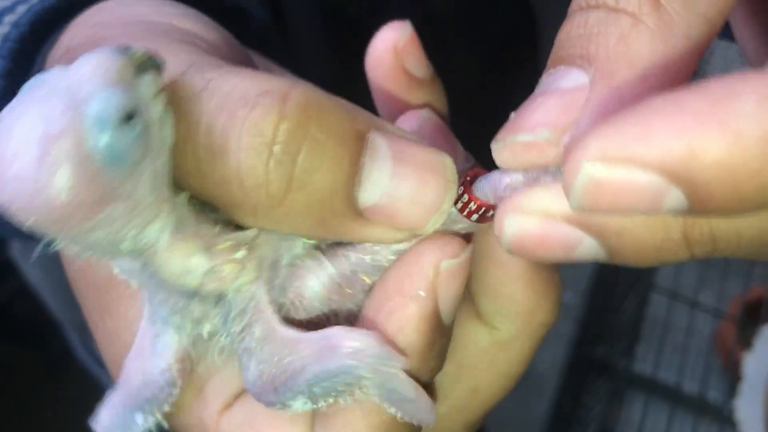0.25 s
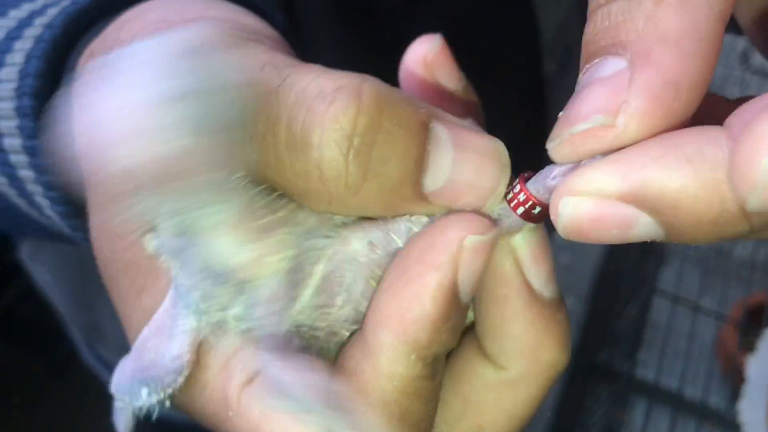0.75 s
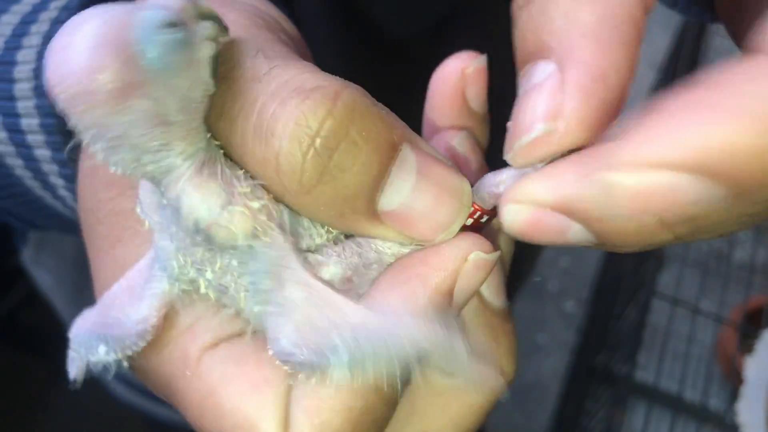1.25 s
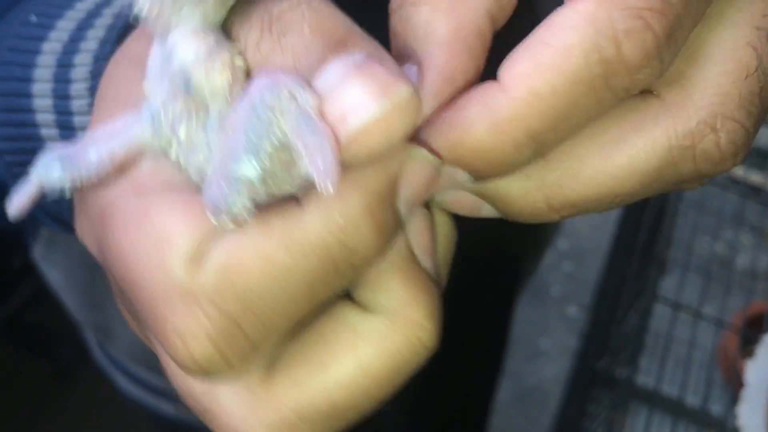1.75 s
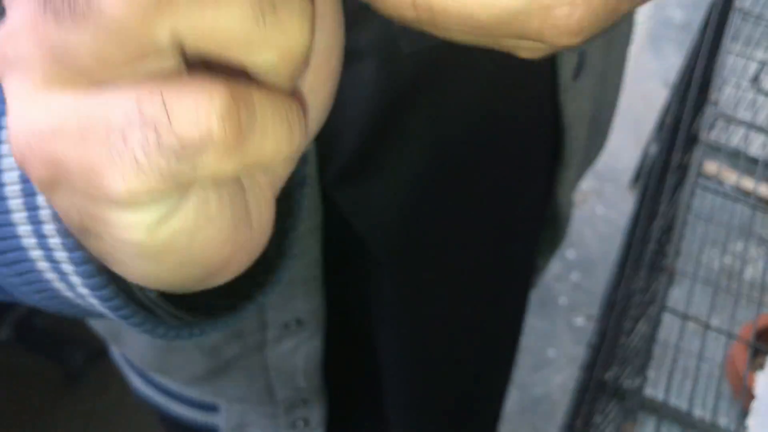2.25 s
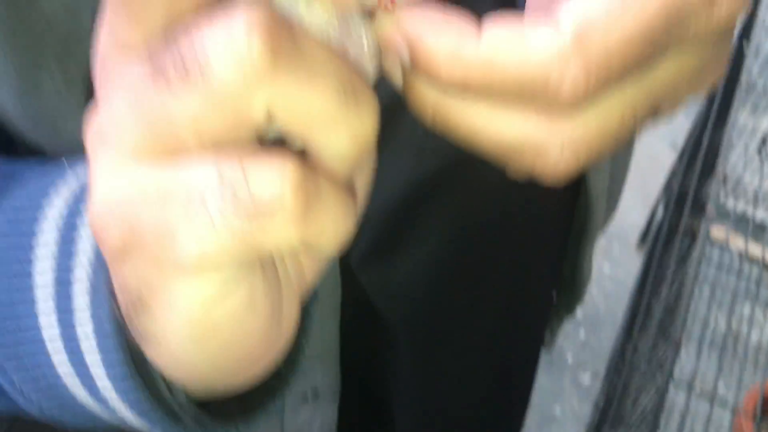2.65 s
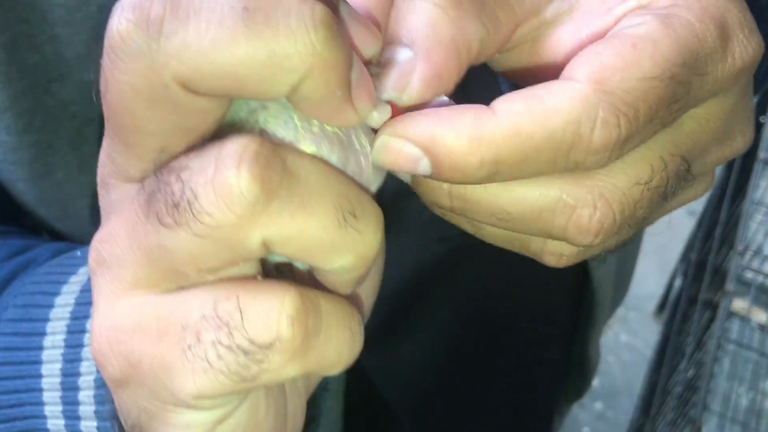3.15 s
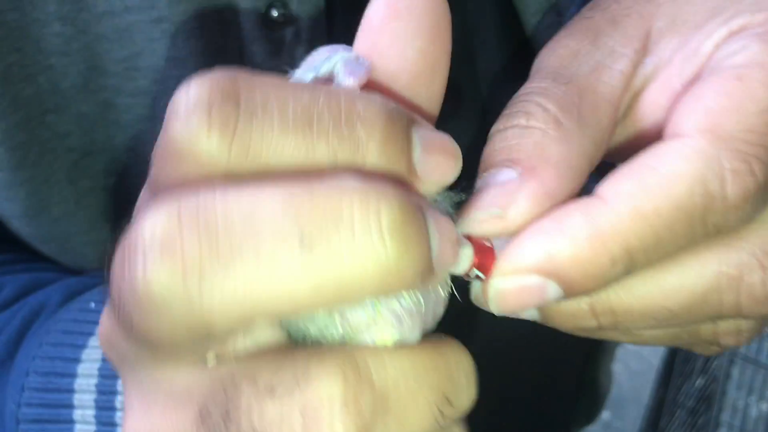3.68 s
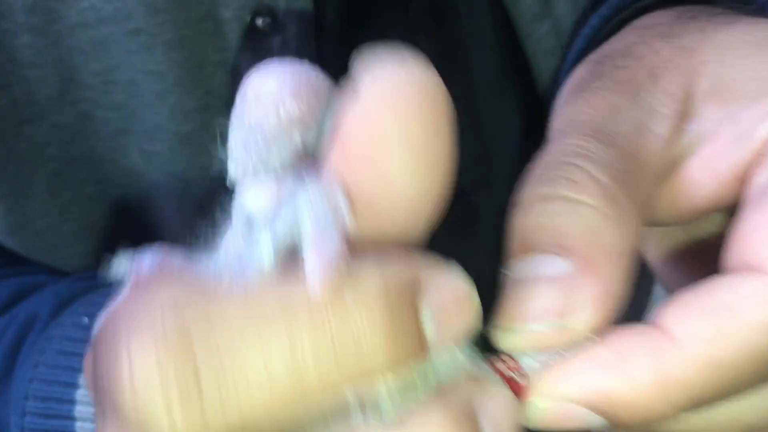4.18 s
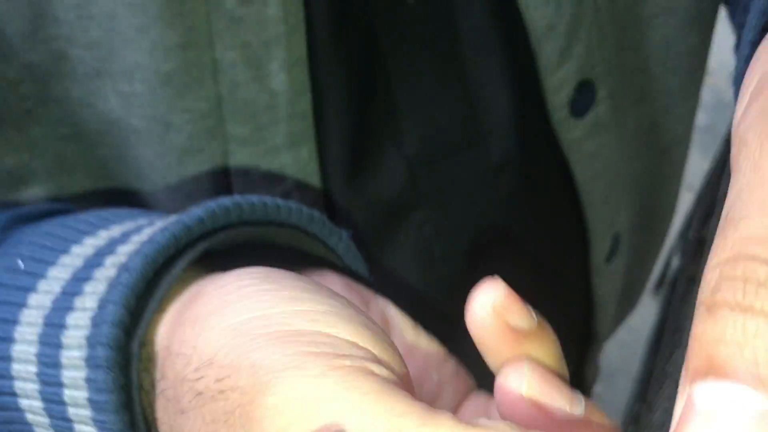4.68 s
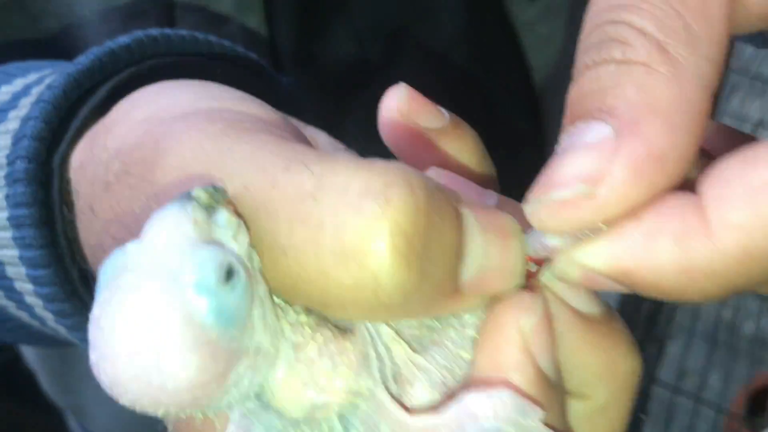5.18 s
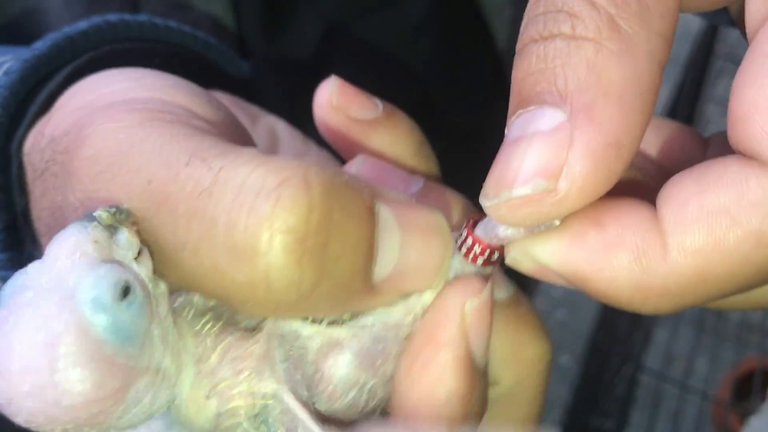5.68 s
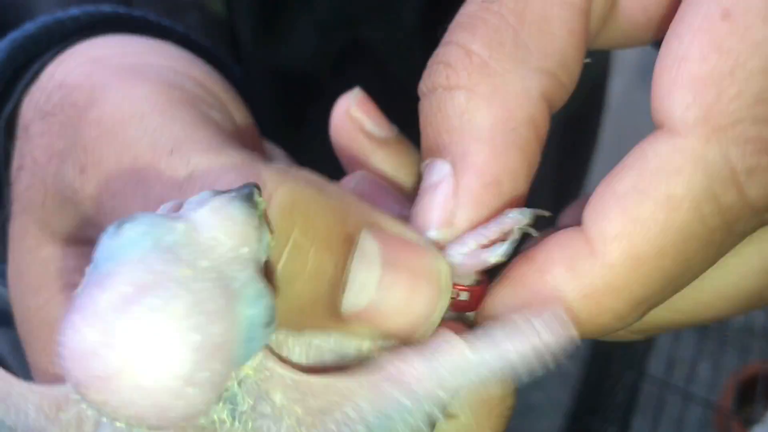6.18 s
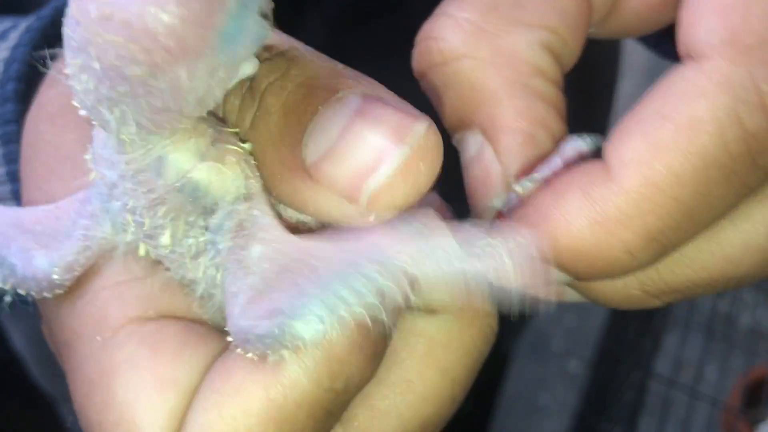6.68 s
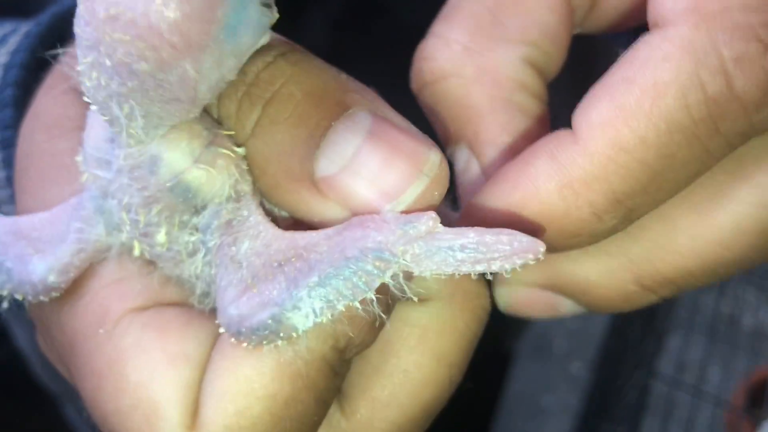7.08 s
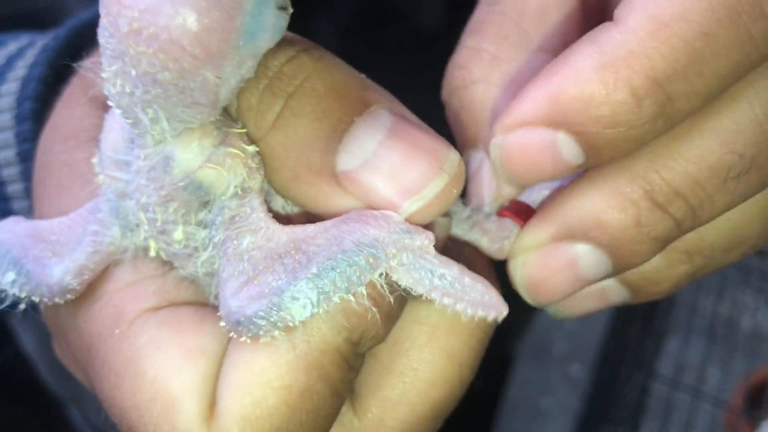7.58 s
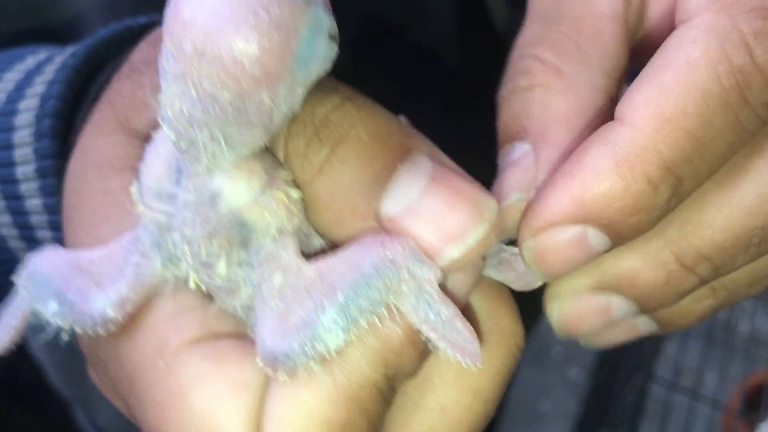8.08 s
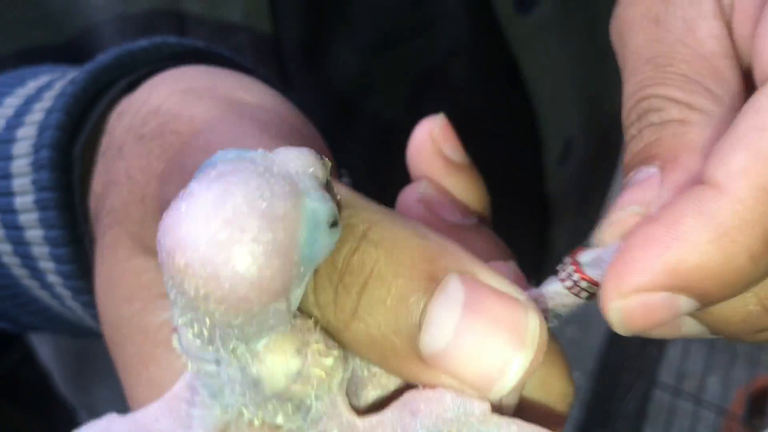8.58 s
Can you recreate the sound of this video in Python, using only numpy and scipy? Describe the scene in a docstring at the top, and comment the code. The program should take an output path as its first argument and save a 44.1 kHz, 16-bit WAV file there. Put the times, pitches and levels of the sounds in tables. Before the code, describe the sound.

A frightened parrot chick gives quick whistles breaking into rasps in an echoing room, with softer chirps and a few small clicks.

```python
"""A hard, echoing bird room: a parrot chick, held in the hands, cries in fright about four times a second.
Each cry is a thin whistle that breaks into a lower, falling rasp. Softer calls come between, from it
and from other chicks; every voice is syrinx harmonics and hiss shaped by throat and beak.
Something scrapes once close by, fingers tick on a leg ring, and the room hums faintly."""
import sys
import numpy as np
from scipy import signal
from scipy.fft import rfft, irfft, next_fast_len
from scipy.io import wavfile
from scipy.ndimage import map_coordinates

SR = 44100
rng = np.random.default_rng(int(sys.argv[2]) if len(sys.argv) > 2 else 0)


def transcribe(u):
    """Save the signal u as a 16-bit wav file named by the first command-line argument.

    u: samples, shape (n,) or (channels, n), limited to [-1, 1]; the rate is SR.
    q: integer samples, one column per channel.
    """
    v = np.clip(np.atleast_2d(u).T, -1, 1)
    q = np.round(v * 32767).astype(np.int16)
    wavfile.write(sys.argv[1], SR, q)


N = 389844
TOP_HZ = 15750


def amp(db):
    return 10 ** (np.asarray(db) / 20)


def unit_rms(x):
    return x / np.sqrt(np.mean(x ** 2) + 1e-20)


def along(points, hz):
    """Interpolate (f/Hz, value) points on a log axis."""
    f, v = np.transpose(points)
    return np.interp(np.log(hz + 1), np.log(f + 1), v)


def wobble(rate_hz, n):
    """Smooth random curve, n samples, knots at rate_hz."""
    knots = rng.standard_normal(4096)
    return map_coordinates(knots, [np.arange(n) * rate_hz / SR], mode="wrap")


def filtered(x, response):
    """Apply the gain response(f/Hz)."""
    m = next_fast_len(len(x) + 2048)
    return irfft(rfft(x, m) * response(np.fft.rfftfreq(m, 1 / SR)), m)[:len(x)]


def coloured(x, spectrum):
    """Shape by (f/Hz, level/dB) points; rms 1."""
    return unit_rms(filtered(x, lambda hz: amp(along(spectrum, hz))))


def add(track, start_s, x):
    part = track[max(round(start_s * SR), 0):][:len(x)]
    part += x[:len(part)]


def progress(length_s):
    """Ramp 0 to 1, at least 4 ms."""
    return np.linspace(0, 1, int(max(length_s, .004) * SR))


def swell(u, rise, fall):
    """Note envelope; rise and fall are shares of its length."""
    return np.sin(np.pi / 2 * np.clip(u / rise, 0, 1)) * np.sin(np.pi / 2 * np.clip((1 - u) / fall, 0, 1))


def peak_db(t, rise_db_per_s, fall_db_per_s):
    """Triangle peaking at 0 dB at t = 0."""
    return np.minimum(rise_db_per_s * t, -fall_db_per_s * t)


def air(hum_hz=61.8):
    """Room noise and a low, unsteady hum."""
    spectrum = [(20, -24), (45, -4), (80, -1), (105, 4), (140, -1), (195, 2.5), (330, -2), (480, -8),
                (1000, -3.5), (1600, -8.5), (2700, -11.5), (5000, -18), (12000, -23.5), (15500, -28.5)]  # f/Hz, level/dB
    levels = [(0, -54, -64), (1.3, -53, -54), (2.5, -53.5, -62.5), (3.6, -56.5, -67), (5.3, -55, -59),
              (6.4, -54, -58.5), (7.4, -52.5, -56.6), (8.2, -52.5, -62), (8.84, -55.5, -53)]  # t/s, relative noise level/dB, relative hum level/dB
    t = np.arange(N) / SR
    knots_s, noise_db, hum_db = np.transpose(levels)
    noise = amp(np.interp(t, knots_s, noise_db) + 4) * coloured(rng.standard_normal(N), spectrum)
    hum = np.sin(2 * np.pi * hum_hz * t + 1.3 * wobble(15, N))
    hum_gain = amp(np.interp(t, knots_s, hum_db) + 2.5 + 3 * wobble(8.8, N))
    return noise + hum_gain * hum


def echo(build_s=0.0019):
    """Hard walls: eight early reflections; dense tail, longest near 1.2 kHz, shortest in the bass."""
    decay = [(300, 0.2), (1200, 1.99), (3300, 1.25), (6000, 0.93), (10000, 0.75), (15000, 0.61)]  # f/Hz, t60/s
    hz, t, bins = signal.stft(rng.standard_normal(SR + SR // 4), SR, nperseg=256)
    envelope = amp(-60 * t / along(decay, hz)[:, None]) * (1 - np.exp(-t / build_s))
    tail = signal.istft(bins * envelope, SR, nperseg=256)[1]
    walls = np.zeros(len(tail))
    walls[rng.integers(SR // 300, SR // 30, size=8)] = rng.choice([-1, 1], size=8)
    return tail / np.linalg.norm(tail) + 0.078 * walls


def room(x):
    """The bird keeps moving, so each stretch of sound meets new echoes."""
    hop = SR // 3
    padded, out = np.pad(x, (hop, 2 * hop)), np.zeros(N + hop)
    fade = np.sin(np.linspace(0, np.pi, 2 * hop))
    for start in range(0, N + hop, hop):
        add(out, start / SR, signal.fftconvolve(padded[start:start + 2 * hop] * fade, echo()))
    return out[hop:]


def ring_ticks(snap_t60_s=0.12, knock_t60_s=0.29):
    """Nail on ring: a bright snap, and a dull knock from the hand."""
    ticks = [(0.722, -53, -70), (0.990, -44, -65), (1.898, -49, -62), (1.926, -36.5, -32),
             (7.049, -42, -67)]  # t/s, snap level/dB, knock level/dB
    snap = [(800, -33), (4000, 12), (7000, 7), (10000, 2), (13000, 13), (15500, -6)]  # f/Hz, level/dB
    knock = [(120, -34), (320, 6), (550, -5), (950, 8), (3000, 7), (6000, -32)]  # f/Hz, level/dB
    out, t = np.zeros(N), np.arange(SR // 8) / SR
    for start_s, snap_db, knock_db in ticks:
        for spectrum, db, t60_s in (snap, snap_db, snap_t60_s), (knock, knock_db, knock_t60_s):
            add(out, start_s, amp(db - 60 * t / t60_s) * coloured(rng.standard_normal(len(t)), spectrum))
    return out


def scrape(start_s=2.243, length_s=.044, slip_hz=760, slip_t60_s=0.0051, sink_octaves_per_s=37):
    """A quick run of tiny slips, each a noise burst, over a sinking resonance."""
    spectrum = [(900, -15), (1500, 6), (2300, 3), (3300, -8.5), (4200, -7.5), (6500, 1.5), (7700, -6),
                (11800, -2.5), (13500, -16), (15500, -8)]  # f/Hz, level/dB
    t = np.arange(0, length_s, 1 / SR)
    n = len(t)
    cycles = np.cumsum(slip_hz * (1 + 0.18 * wobble(500, n))) / SR
    slips = amp(-60 * (cycles % 1) / slip_hz / slip_t60_s)
    crackle = coloured(slips * rng.standard_normal(SR // 2)[:n], spectrum)
    body_hz = 2115 * 2 ** (-sink_octaves_per_s * t) * (1 + 0.19 * wobble(1472, n))
    body = np.sin(2 * np.pi * np.cumsum(body_hz) / SR)
    body = unit_rms(body * amp(2.8 * wobble(915, n)))
    crackle_db = -21.5 + peak_db(t - 0.0082, rise_db_per_s=400, fall_db_per_s=450)
    body_db = -25 + peak_db(t - 0.028, rise_db_per_s=900, fall_db_per_s=1400)
    out = np.zeros(N)
    add(out, start_s, amp(crackle_db) * crackle + amp(body_db) * body)
    return out


def syrinx(pitch_hz, rough, throat_db, tilt_db_per_octave=1.0, fade_db=8.0, second_db=0):
    """Ten harmonics through the throat; roughness shakes pitch and level and lets air hiss through."""
    n = len(pitch_hz)
    pitch_hz = pitch_hz * (1 + (0.0035 + 0.0219 * rough) * wobble(108, n))
    jitter = 1 + (0.0067 + 0.067 * rough) * wobble(1300, n)
    phase = 2 * np.pi * np.cumsum(pitch_hz * jitter) / SR
    throat = lambda hz: amp(throat_db(hz)) * (hz < TOP_HZ)
    tone = np.zeros(n)
    for k in range(1, 11):
        harmonic_db = tilt_db_per_octave * np.log2(k) + second_db * (k == 2)
        head_motion_db = fade_db * np.tanh(wobble(75.7, n))
        tone += throat(k * pitch_hz) * amp(harmonic_db + head_motion_db) * np.sin(k * phase)
    flutter = amp((3.5 + 1.35 * rough) * np.tanh(wobble(449, n)))
    puffs = rng.standard_normal(SR // 2)[:n] * (1 + np.cos(phase))
    hiss = unit_rms(filtered(puffs, throat))
    hiss_gain = np.clip(0.91 * rough, 0, 1)
    return unit_rms(flutter * (np.sqrt(1 - hiss_gain ** 2) * unit_rms(tone) + hiss_gain * hiss))


def soft_throat_db(hz, tilt_db_per_octave):
    """Throat response in soft calls, tilted about 3 kHz."""
    response = [(500, -16), (1000, 0), (1700, 2), (2400, 2.5), (3300, -0.5), (4400, -3.5), (5200, -9.5),
                (6200, -9.5), (7500, -14.5), (9500, -16.5), (11500, -24), (15500, -29)]  # f/Hz, level/dB
    return along(response, hz) + tilt_db_per_octave * np.log2(np.clip(hz, 1000, 8000) / 3000)


def far_chicks(count=50):
    """Other chicks chirp hoarsely at random across the room."""
    out = np.zeros(N)
    for i, (offset, length, pitch, strength) in enumerate(rng.random((count, 4))):
        u = progress(0.0298 + 0.0598 * length)
        pitch_hz = (1100 + 900 * pitch) * (1 - .25 * u)
        note = syrinx(pitch_hz, rough=0.56, throat_db=lambda f: soft_throat_db(f, -12))
        start_s = (i + offset) / count * N / SR
        add(out, start_s, amp(-52 + 2 * strength) * swell(u, rise=0.2, fall=0.65) * note)
    return out


def notes(rows, glide, bend, rough, tilt_db_per_octave, rise, fall):
    """Calls gliding by a share of their pitch, early if bend < 1; the beak resonates and adds treble
    as it opens."""
    beak_db, beak_width, beak_rest_hz = 9, 0.36, 3000  # width: half-width over resonance frequency
    out = np.zeros(N)
    for start_s, length_s, hz, db, beak_hz in rows:
        u = progress(length_s)
        gape_db_per_octave = 4 * np.log2(beak_hz / beak_rest_hz)
        resonance_db = lambda f: beak_db / (1 + ((f / beak_hz - 1) / beak_width) ** 2)
        throat_db = lambda f: soft_throat_db(f, tilt_db_per_octave + gape_db_per_octave) + resonance_db(f)
        note = syrinx(hz * (1 + glide * u ** bend), rough, throat_db)
        add(out, start_s, amp(db) * swell(u, rise, fall) * note)
    return out


def small_calls():
    """Thin peeps, hoarse sagging squawks, falling chirps, bright rising squeals, stuttered clucks."""
    # t/s, length/s, starting pitch/Hz, relative level/dB, beak resonance/Hz
    peeps = [ (.363, 0.036, 1727, -43.5, 3400), (.583, 0.11, 1518, -44, 4350), (.925, .1, 1600, -45, 3540),
             (1.323, 0.11, 1482, -50.5, 4350), (1.791, 0.096, 1970, -44.5, 1950),
             (1.943, 0.047, 1320, -37, 6300), (2.318, 0.041, 2750, -36, 2780),
             (3.227, 0.11, 3043, -31, 6460), (4.247, 0.086, 3266, -26.5, 3120),
             (4.525, 0.081, 3290, -26, 3250), (6.184, 0.053, 1127, -42, 1140),
             (7.673, 0.072, 1847, -48.5, 3650), (7.932, 0.065, 1065, -44, 4200),
             (8.057, 0.1, 1107, -44.5, 4270), (8.199, 0.074, 1128, -41, 4300),
             (8.572, 0.08, 3530, -42.5, 3500)]
    squawks = [ (0, 0.039, 1805, -33, 3270), (.12, 0.095, 1655, -37.5, 3200),
               (.418, 0.066, 1670, -44.5, 1600), (.675, 0.096, 1505, -42.5, 1400),
               (1.04, 0.066, 1585, -47, 1560), (1.51, 0.089, 1153, -39, 1500),
               (1.673, 0.06, 1330, -43.5, 2500), (2.366, .075, 1384, -36.5, 1600),
               (2.516, 0.058, 2060, -39, 2530), (3.313, 0.086, 1840, -26, 3230),
               (4.557, 0.15, 2176, -30.5, 3140), (5.746, 0.068, 1924, -33.5, 1960),
               (6.07, 0.099, 3440, -30.5, 3000), (8.272, .23, 1530, -40.5, 1470)]
    chirps = [ (1.762, 0.026, 2870, -45, 2270), (1.925, 0.007, 4100, -35, 3730),
              (1.945, 0.024, 3100, -36.5, 2600), (2.346, 0.036, 3270, -34.5, 3080),
              (4.226, 0.027, 2430, -24, 5000), (6.612, 0.017, 2096, -23.5, 6500),
              (6.624, 0.019, 1620, -32, 1400), (6.626, 0.0238, 1255, -29, 2190),
              (7.313, 0.033, 1940, -41.5, 1770), (7.575, 0.029, 1760, -49, 1580),
              (8.504, 0.038, 1350, -39, 4600), (8.641, 0.1, 1840, -31.5, 3930)]
    squeals = [ (.648, 0.034, 2340, -40, 2400), (2.074, 0.029, 1400, -39, 3000),
               (2.128, 0.037, 1570, -42, 3280), (4.148, .012, 2036, -20.5, 6370),
               (4.164, 0.0355, 1972, -18.5, 5640), (4.199, 0.034, 2320, -23, 5100),
               (4.494, 0.0645, 2954, -21.5, 5460)]
    clucks = [ (6.547, 0.0049, 1580, -27.5, 3120), (6.564, 0.0081, 1610, -27.5, 3080),
              (6.581, 0.0035, 1740, -24, 3230), (6.596, 0.0066, 1862, -23.5, 5200),
              (8.469, 0.011, 1260, -30, 3580), (8.487, 0.013, 1170, -28.5, 4500)]
    return (
        notes(peeps, glide=-.0345, bend=.94, rough=.27, tilt_db_per_octave=-2.5, rise=.077, fall=.12)
        + notes(squawks, glide=-.1, bend=1.05, rough=.833, tilt_db_per_octave=5, rise=.04, fall=.091)
        + notes(chirps, glide=-.25, bend=1.05, rough=.26, tilt_db_per_octave=-1.5, rise=.31, fall=.52)
        + notes(squeals, glide=.1, bend=.454, rough=.43, tilt_db_per_octave=5.5, rise=.073, fall=.09)
        + notes(clucks, glide=-.063, bend=1.35, rough=.38, tilt_db_per_octave=4.5, rise=.31, fall=.18))


def whistle(length_s, hz, db, effort):
    """Beak narrow: a thin tone that jumps in strength midway and droops with effort."""
    throat = [(1500, -23), (3300, 5.5), (4000, 5), (5200, -9), (7200, -13), (10500, -19), (15000, -32)]  # f/Hz, level/dB
    u = progress(length_s)
    jump = np.clip((u - 0.46) / 0.07, 0, 1)
    droop = .12 * effort * np.interp(u, [0, .5, .95], [0, .12, 1.1])
    rough = 0.079 + 0.65 * u ** 3
    voice = syrinx(hz * (1 - droop), rough, lambda f: along(throat, f),
                   tilt_db_per_octave=4 - 3 * jump, fade_db=2.5)
    return amp(db - 9 + 5 * jump) * swell(u, rise=0.37, fall=0.028) * voice


def rasp(hz, db, effort, length_s=.088):
    """Beak wide: the broken voice falls and frays; a weak cry is hoarser."""
    throat = [(600, -25.5), (1300, -9.5), (2100, -5), (2700, 3.5), (3400, 5.5), (4400, -0.5), (5200, -5.5),
              (6800, -10), (8600, -7.5), (10000, -13), (11500, -20), (15500, -35)]  # f/Hz, level/dB
    u = progress(length_s)
    pitch_hz = hz * (1 - .3 * u ** 1.1)
    rough = 0.39 - 0.27 * effort + 0.59 * u ** 0.98
    voice = syrinx(pitch_hz, rough, lambda f: along(throat, f),
                   tilt_db_per_octave=1.8, fade_db=5, second_db=3.5)
    return amp(db + 2.5 - 1.24 * u) * swell(u, rise=0.099, fall=0.067) * voice


def cries(calm_hz=3230, panic_hz=3650):
    """Each whistle breaks to a lower rasp; higher pitch means more effort."""
    # t/s, whistle length/s, whistle f/Hz, relative whistle level/dB, relative rasp level/dB
    events = [ (3.027, .061, 3856, -18.5, -24.5), (3.293, .12, 3800, -16, -20.5),
              (3.604, 0.067, 3673, -12.5, -21.5), (3.881, 0.076, 3666, -13, -22),
              (4.658, 0.07, 3627, -12.5, -21.5), (4.917, 0.076, 3676, -13.5, -22.5),
              (5.175, .071, 3656, -14, -23), (5.368, 0.073, 3304, -21.5, -29),
              (5.627, 0.057, 3225, -17.5, -29.5), (5.928, 0.082, 3256, -19, -30)]
    whistles, rasps = np.zeros(N), np.zeros(N)
    for start_s, length_s, hz, whistle_db, rasp_db in events:
        effort = np.clip((hz - calm_hz) / (panic_hz - calm_hz), 0, 1)
        rasp_hz = 2324 * (hz / panic_hz) ** .4
        add(whistles, start_s, whistle(length_s, hz, whistle_db, effort))
        add(rasps, start_s + length_s, rasp(rasp_hz, rasp_db, effort))
    return whistles, rasps


def scene():
    """Chicks and ticks echo in the room; the close scrape stays dry."""
    whistles, rasps = cries()
    voices = rasps + small_calls()
    far, ticks = far_chicks(), ring_ticks()
    direct = amp(-4.5) * whistles + amp(-3.5) * voices + amp(4) * far + ticks + scrape()
    echoes = amp(-2.5) * room(amp(-0.5) * whistles + voices + far + .5 * ticks)
    return (direct + echoes + air())[None]


def record(dry, ceiling=.45):
    """Soft clip, then low-pass at TOP_HZ."""
    rounded = dry[0] / (1 + np.abs(dry[0] / ceiling) ** 4) ** (1 / 4)
    return filtered(rounded, lambda hz: hz < TOP_HZ)[None]


dry = scene()
out = record(dry)
transcribe(out)
```